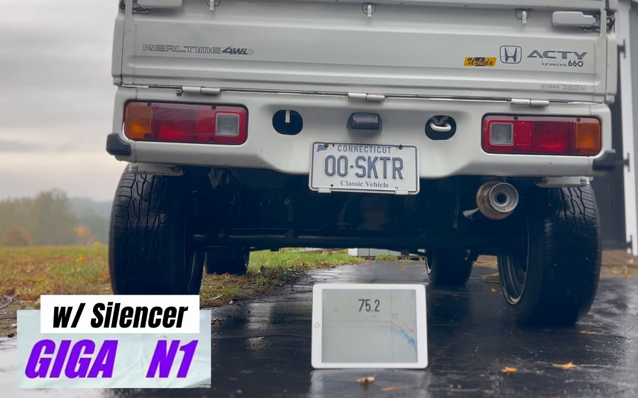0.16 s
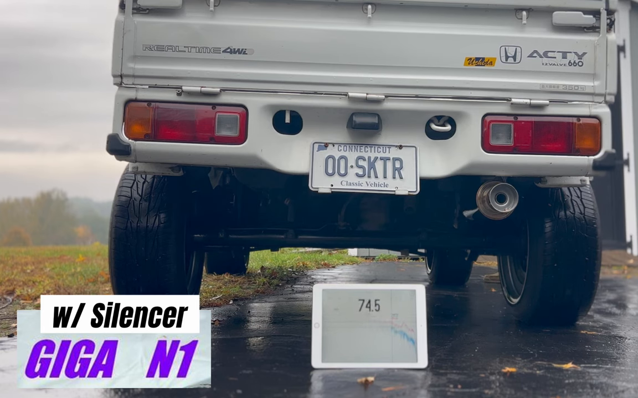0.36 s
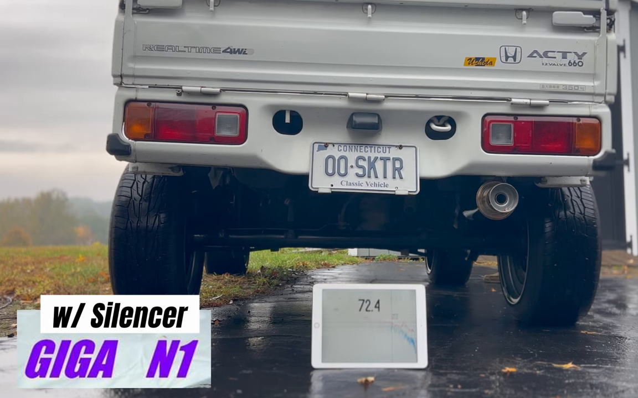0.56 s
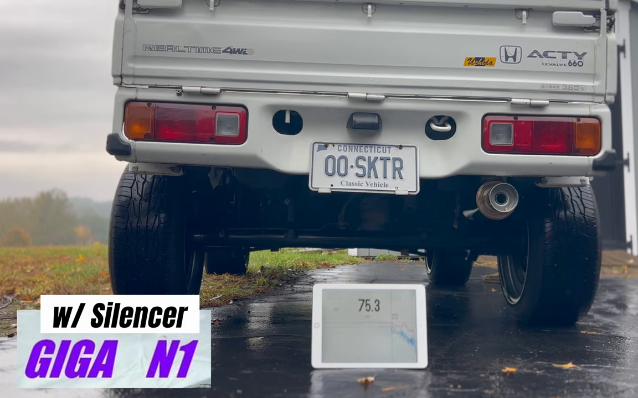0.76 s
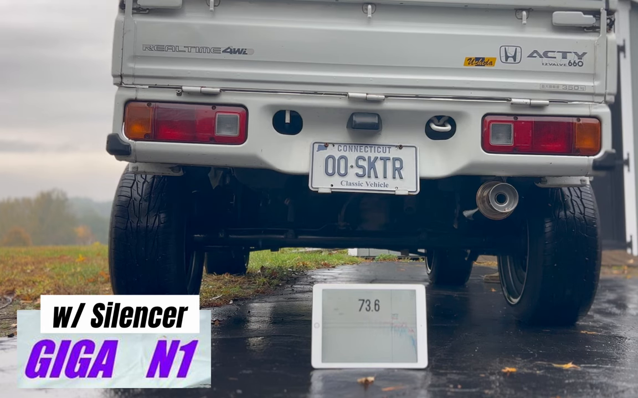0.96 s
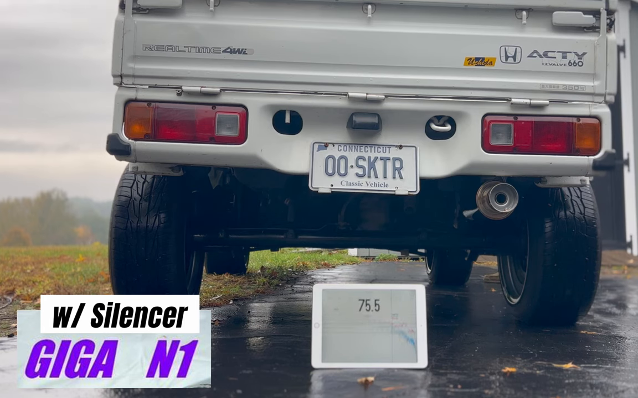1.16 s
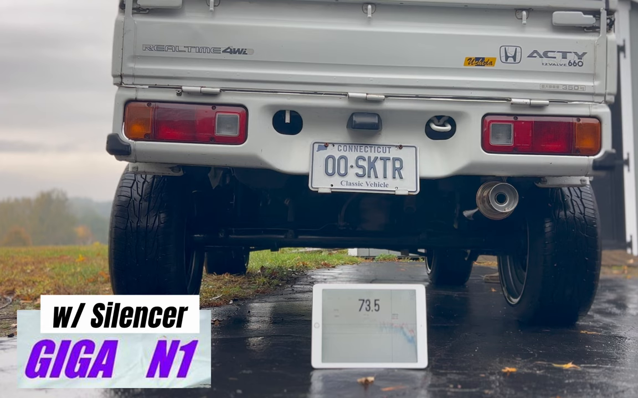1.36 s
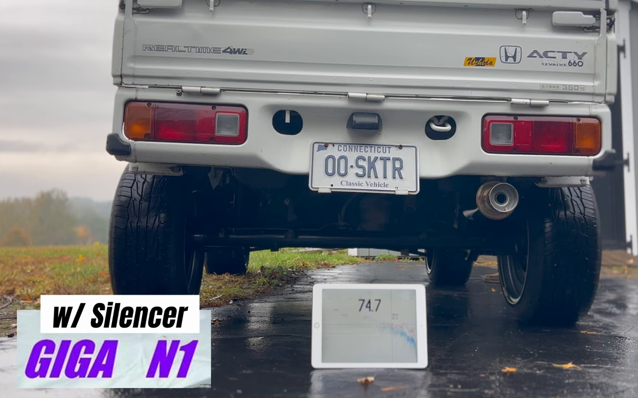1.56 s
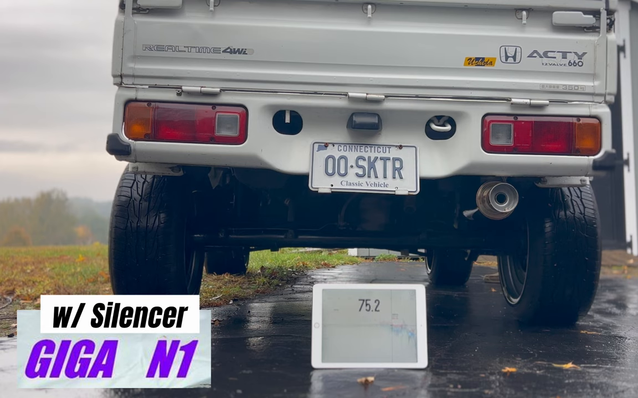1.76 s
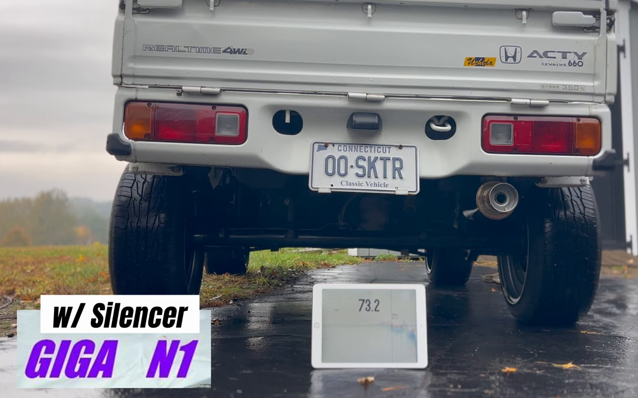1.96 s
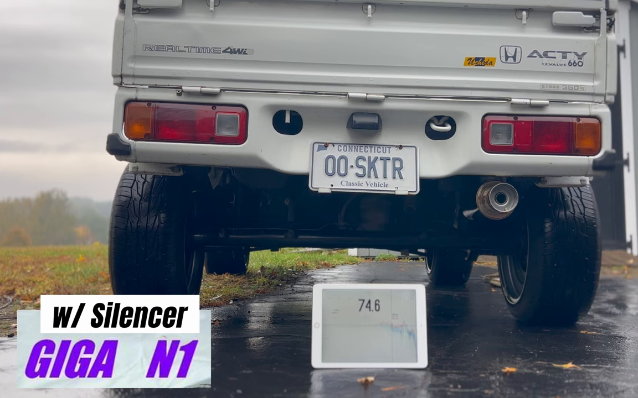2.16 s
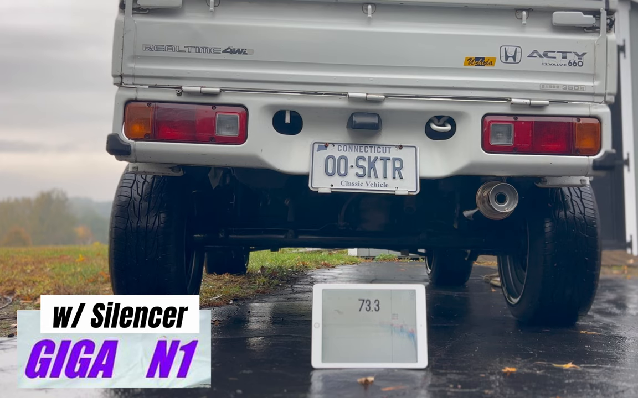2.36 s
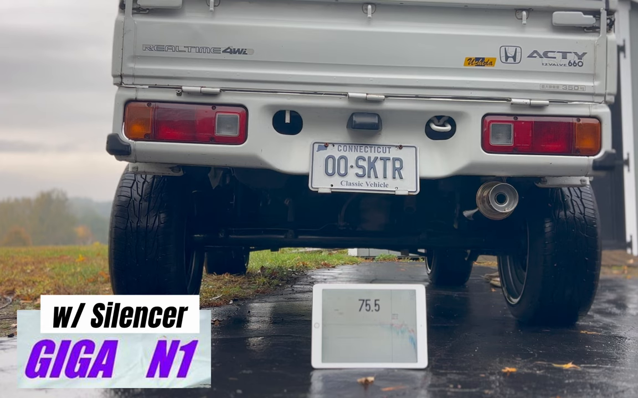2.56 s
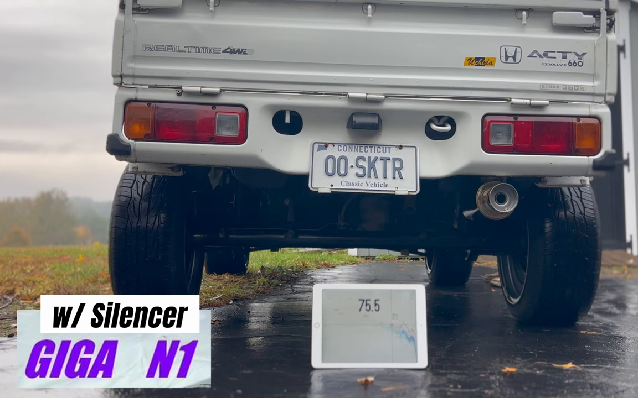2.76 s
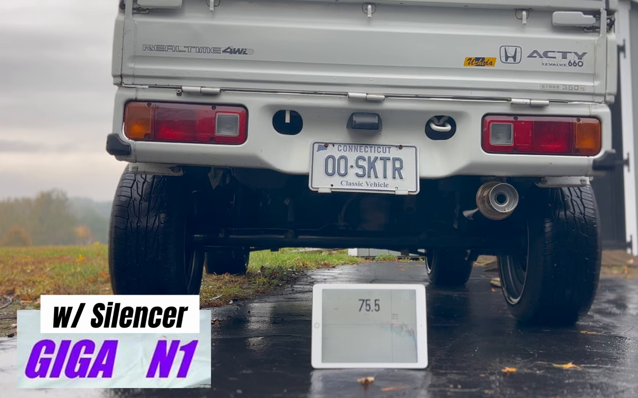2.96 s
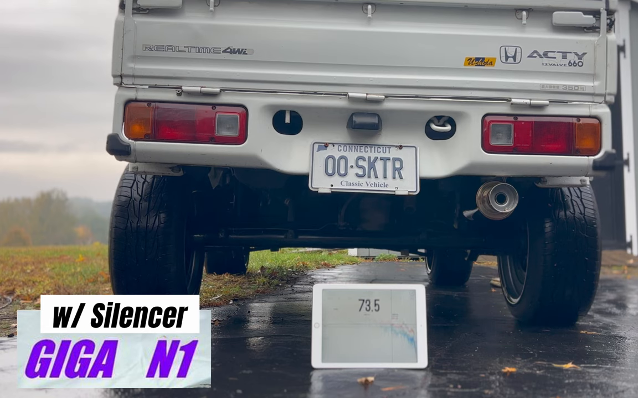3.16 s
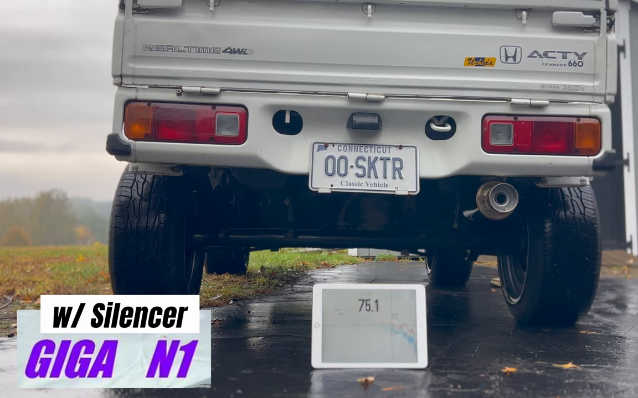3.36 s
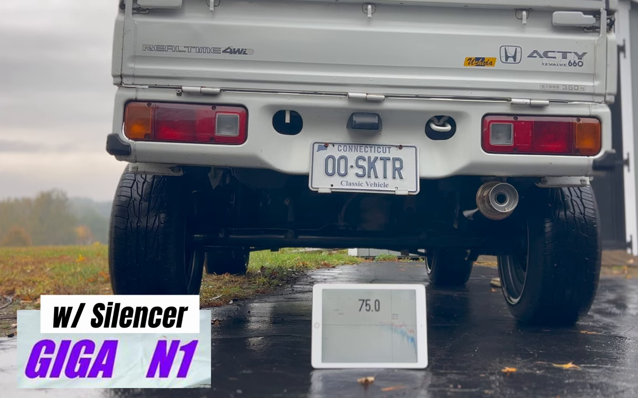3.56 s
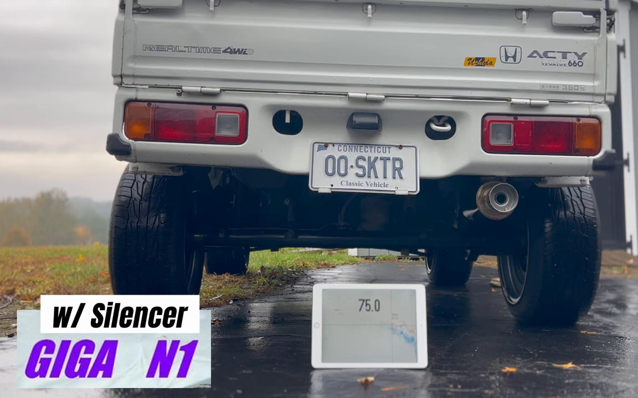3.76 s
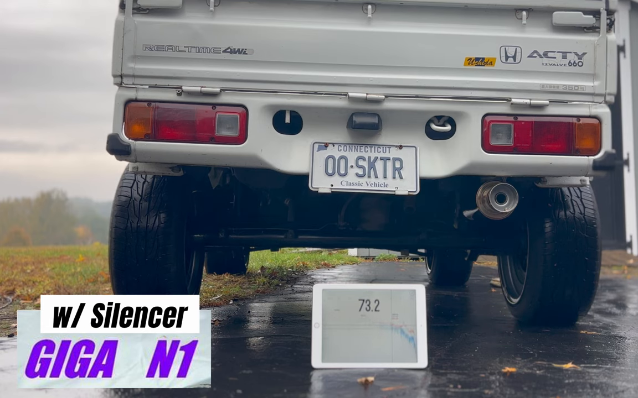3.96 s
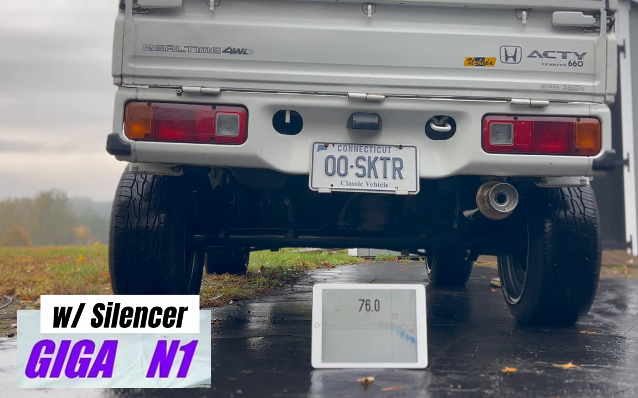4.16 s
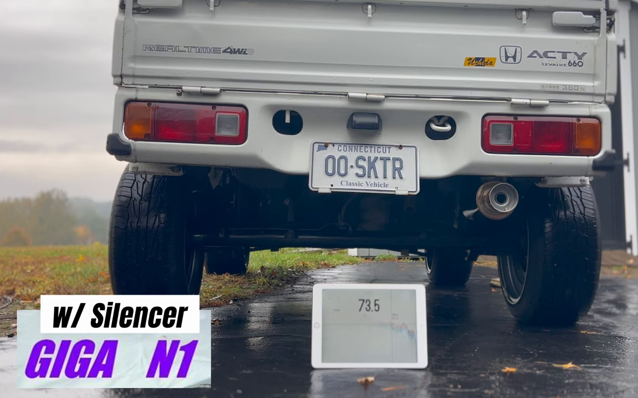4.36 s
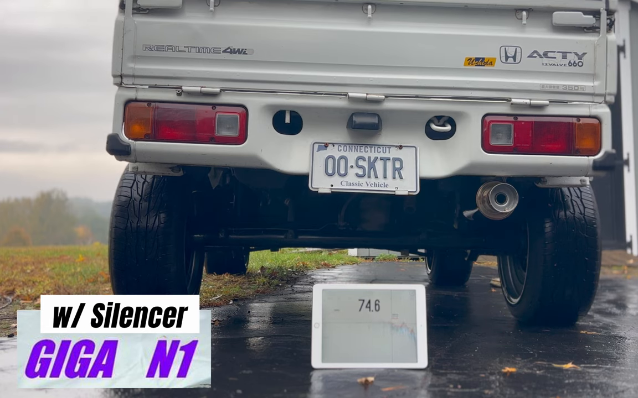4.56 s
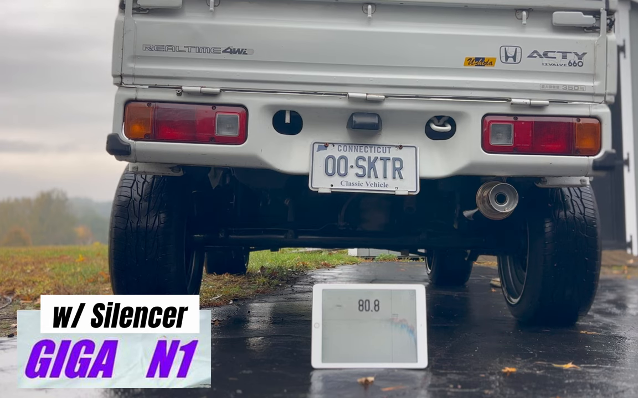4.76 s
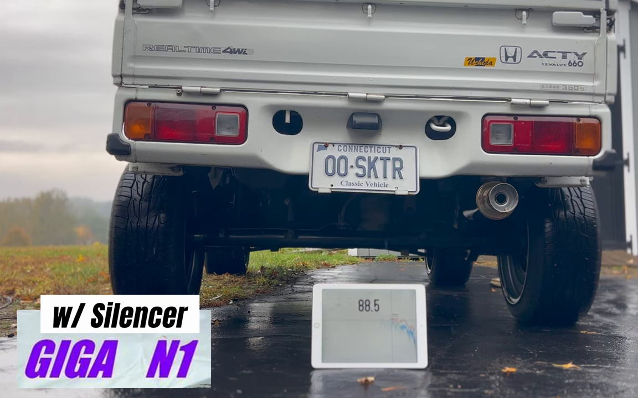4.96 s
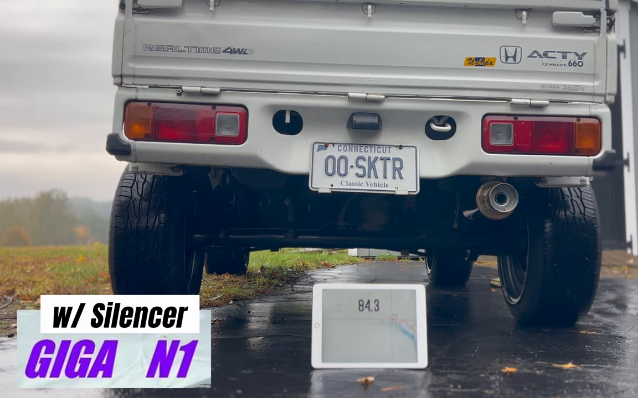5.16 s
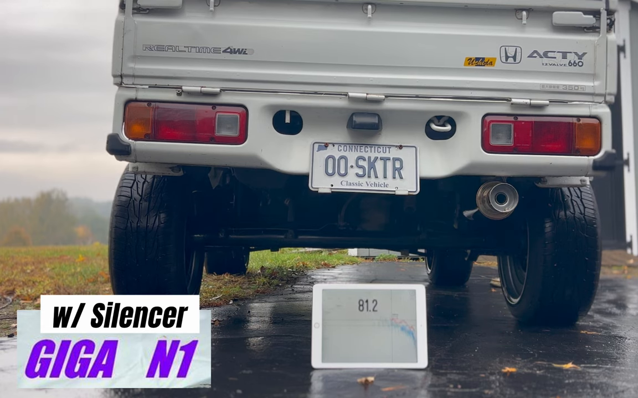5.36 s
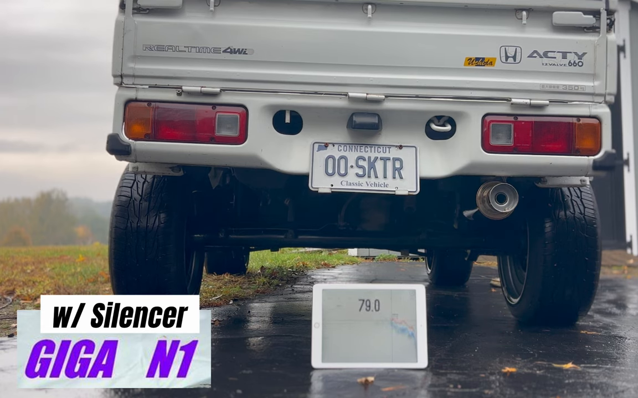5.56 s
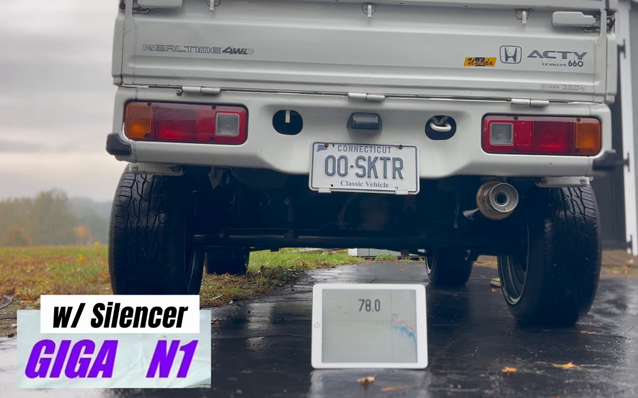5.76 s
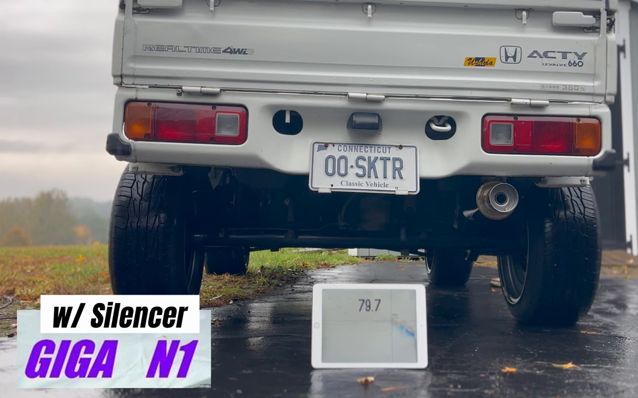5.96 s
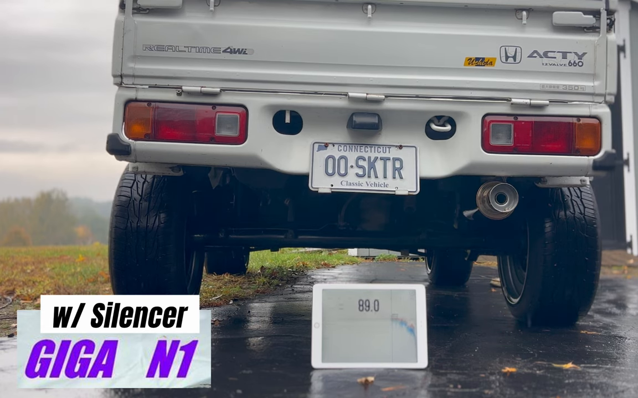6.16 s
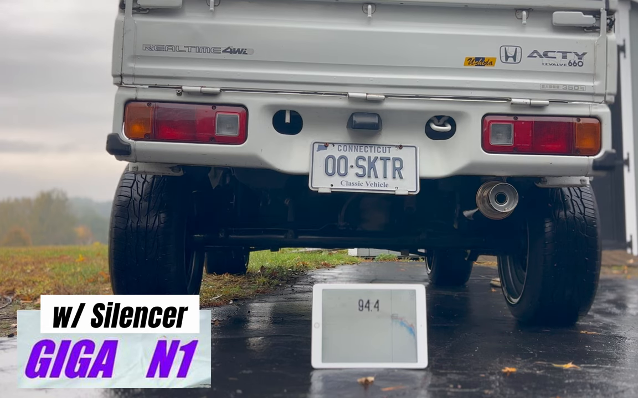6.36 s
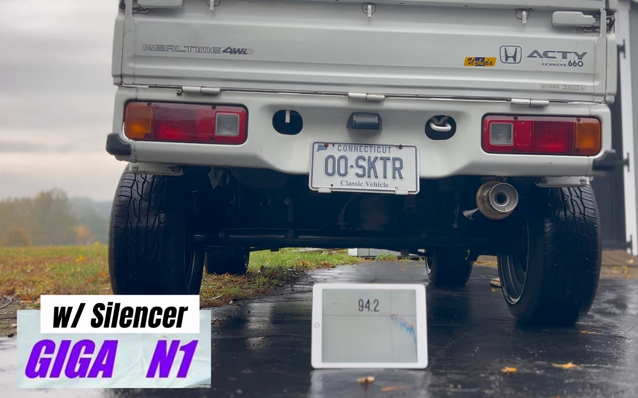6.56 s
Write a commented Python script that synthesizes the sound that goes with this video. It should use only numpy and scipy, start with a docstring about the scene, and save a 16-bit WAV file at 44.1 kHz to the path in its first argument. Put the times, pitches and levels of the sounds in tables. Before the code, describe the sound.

A steady lumpy idle of a small truck engine, deep muffled putts with fine dry ticks, heard dry and near in open air by a stereo microphone behind the exhaust. After four seconds the throttle is stabbed, giving a short throaty burst that hangs and falls. Before it reaches idle, a stronger press climbs into a fast raspy growl with accessory whine and gas rush, easing slightly before another stab.

```python
"""Three-cylinder truck, blipped and revved

A small truck idles on wet tarmac, is blipped once, then revved higher, heard from just behind its tailpipe.
Each firing thumps through the silencer, rasps in the pipework and puffs out gas; the valves tick in between.
A driven accessory whines with engine speed, and a faint thin squeal passes early on.
At speed the exhaust growls, the open throttle cracks, and gas rushes brightly near top revs."""
import sys
import numpy as np
from scipy import signal
from scipy.fft import rfft, irfft, next_fast_len
from scipy.io import wavfile

SR = 44100
rng = np.random.default_rng(int(sys.argv[2]) if len(sys.argv) > 2 else 0)


def master(y):
    """Save y as 16-bit WAV."""
    cut = np.clip(np.atleast_2d(y).T, -1, 1)
    pcm = np.round(cut * 32767)  # scale
    wavfile.write(sys.argv[1], SR, pcm.astype(np.int16))


N = 295470
TIME = np.arange(N) / SR  # s
IDLE_HZ = 20.4  # reference firing rate at idle


def undb(db):
    """Decibels to gain."""
    return 10 ** (np.asarray(db) / 20)


def unit(x):
    """Scale to rms 1."""
    return x / np.sqrt(np.mean(x ** 2))


def colour(x, points):
    """Minimum-phase filter through (Hz, dB) points, joined by straight lines over log frequency."""
    size = 2 ** 14
    hz, db = np.transpose(points)
    bins_hz = np.fft.rfftfreq(size, 1 / SR) + 1  # the 1 keeps the logarithm finite
    curve_db = np.interp(np.log(bins_hz), np.log(hz), db)
    # folding the cepstrum onto positive time makes the filter causal
    cepstrum = irfft(np.log(undb(curve_db)))[:size // 2]
    cepstrum[1:] *= 2
    response = irfft(np.exp(rfft(cepstrum, size)))[:size // 2]
    return signal.fftconvolve(np.atleast_2d(x), response[None], axes=-1)[:, :N]


def ring(x, modes):
    """The sound itself plus its ringing in (Hz, width Hz, dB) resonances."""
    total = x
    for hz, width_hz, db in modes:
        b, a = signal.iirpeak(hz, hz / width_hz, SR)
        total = total + undb(db) * signal.lfilter(b, a, x)
    return total


def delay(x, ms):
    """Delay by any fraction of a sample, by turning the phase of the spectrum."""
    size = next_fast_len(N + SR // 10)
    cycles = np.fft.rfftfreq(size, 1 / SR) * ms / 1000
    return irfft(rfft(x, size) * np.exp(-2j * np.pi * cycles), size)[..., :N]


def stereo(x, lag_ms, left_db):
    """Place a sound by making the left channel later and louder (softer if left_db is negative)."""
    left = delay(x[0], lag_ms) * undb(left_db / 2)
    right = x[-1] * undb(-left_db / 2)
    return np.array([left, right])


def air(scatter):
    """Stereo noise: a common part and a coloured part scattered by ground and underbody."""
    scatter_colour = [(200, -12.0), (600, 2.5), (5000, 6), (8000, 1.5), (12000, -8)]
    scattered = colour(rng.standard_normal((2, N)), scatter_colour)
    common = rng.standard_normal(N)
    return unit(common + scatter * scattered)


def clicks(times, sizes):
    """One impulse per event, shared between neighbouring samples for exact timing."""
    inside = (times > 0) & (times < TIME[-2])
    index, part = np.divmod(times[inside] * SR, 1)
    index = index.astype(int)
    earlier = np.bincount(index, sizes[inside] * (1 - part), N)
    later = np.bincount(index + 1, sizes[inside] * part, N)
    return earlier + later


def puffs(impulses, rise_s, decay_s):
    """Each impulse becomes an envelope that rises and dies away exponentially."""
    fall, rise = np.exp(-1 / (SR * decay_s)), np.exp(-1 / (SR * rise_s))
    return signal.lfilter([1 - rise], np.poly([fall, rise]), impulses)


def steady(x, phase, count=3):
    """Hold the rms near 1 over each run of `count` firings."""
    energy = np.cumsum(np.mean(np.atleast_2d(x) ** 2, axis=0))
    samples = np.arange(N)
    first = np.interp(phase - count / 2, phase, samples).astype(int)
    last = np.interp(phase + count / 2, phase, samples).astype(int)
    power = np.abs(energy[last] - energy[first]) / (last - first)
    return x / np.sqrt(power + 1e-18)


def held(start, end, attack_s, release_s):
    """Envelope that rises from the start, holds, and falls from the end."""
    rising = (TIME - start) / attack_s
    falling = 1 - (TIME - end) / release_s
    return np.clip(np.minimum(rising, falling), 0, 1)


# The cylinders in firing order. Each row: lateness in firing intervals, strength in dB,
# share reflected in the manifold at idle (signed, 0-1), relative valve tick in dB.
FIRING_CYLINDERS = [(-0.0037, 1, -0.085, 0.5), (0.0177, 0.9, 0.84, 2), (-0.016, -0.03, -0.14, 0.5)]


def firings(phase, timing_scatter, strength_scatter_db):
    """Time, strength, manifold reflection and valve tick of every firing; no two are quite alike."""
    number = np.arange(int(phase[-1]) + 1)
    rows = np.array(FIRING_CYLINDERS)[number % len(FIRING_CYLINDERS)]
    late, db, reflection, tick_db = rows.T
    chance = rng.standard_normal((len(number), 2))
    times = np.interp(number + late + timing_scatter * chance[:, 0], phase, TIME)
    sizes = undb(db + strength_scatter_db * chance[:, 1])
    return times, sizes, reflection, tick_db


# The accelerator. Each row: foot down in seconds, foot up in seconds, time to open in seconds,
# throttle opening (0-1).
PEDAL_PRESSES = [(4.397, 4.64, .11, 0.97), (5.663, 6.205, 0.13, 0.76), (6.594, 6.8, 0.11, 0.66)]
# Light charge that lingers after the foot lifts: the revs hang after the first press and ease after the second.
# # Each row: start in seconds, end in seconds, charge (0-1), extra boom in dB.
LIGHT_CHARGES = [(4.783, 5.026, .45, 6), (6.255, 6.662, 0.64, 0.7)]
SHUT_S = 0.078  # the throttle falls shut
FILL_S, EMPTY_FIRINGS = 0.16, 11.4  # the manifold fills quickly and empties firing by firing
HANG_FADE_S = 0.05


def effort(hz):
    """Throttle opening and cylinder charge (both 0-1): the manifold empties slowly, so charge outlasts a press."""
    throttle, charge = 0, 0
    for down, up, open_s, opening in PEDAL_PRESSES:
        throttle = throttle + opening * held(down, up, open_s, SHUT_S)
        empty_s = EMPTY_FIRINGS / np.interp(up, TIME, hz)
        fill = held(down, up, FILL_S, empty_s)
        charge = np.maximum(charge, np.sin(np.pi / 2 * fill))
    for start, end, hang_charge, _ in LIGHT_CHARGES:
        hang = held(start - HANG_FADE_S, end, HANG_FADE_S, HANG_FADE_S)
        charge = np.maximum(charge, hang_charge * hang)
    return throttle, charge


BOOM_DB, BOOM_KNEE_HZ, BOOM_STEEPNESS = -7.5 - 1.97, 72.8, 8.46  # full above the knee, steep fall below
DIP_DB, DIP_FIRINGS = 7, 2.8  # depth and half-width of the brief dips in the boom


def boom_level(hz):
    """The fundamental grows with speed, swells while a light charge lingers and dips at either end of it (dB)."""
    db = BOOM_DB - 10 * np.log10(1 + (BOOM_KNEE_HZ / hz) ** BOOM_STEEPNESS)
    for start, end, _, extra_db in LIGHT_CHARGES:
        dips = sum(np.exp(-((TIME - edge) * hz / DIP_FIRINGS) ** 2) for edge in (start, end))
        db = db + extra_db * held(start, end, HANG_FADE_S, HANG_FADE_S) - DIP_DB * dips
    return db


# at idle, with speed, on a full charge
BARK_DB, BARK_DB_PER_OCTAVE, BARK_CHARGE_DB = -23 - 0.52, -2.5, 15.5
# at idle, with speed, on a full charge
RASP_DB, RASP_DB_PER_HZ, RASP_CHARGE_DB = -42.5 + 0.66, 0.2242, 1.5
# wide open at idle speed, and how much less the throttle adds as speed rises
RASP_THROTTLE_DB, RASP_EASE_DB_PER_OCTAVE = 10, 1.5
# at idle, with speed, wide open
HISS_DB, HISS_DB_PER_OCTAVE, HISS_THROTTLE_DB = -55.5 + 2.5, 8.5, 6


def levels(hz, throttle, charge):
    """Bark, rasp and hiss (dB) rise with effort; speed softens the single pulse but drives more gas."""
    octaves = np.log2(hz / IDLE_HZ)
    bark_db = BARK_DB + BARK_DB_PER_OCTAVE * octaves + BARK_CHARGE_DB * charge
    open_db = RASP_THROTTLE_DB - RASP_EASE_DB_PER_OCTAVE * octaves
    rasp_db = RASP_DB + RASP_DB_PER_HZ * (hz - IDLE_HZ) + open_db * throttle + RASP_CHARGE_DB * charge
    hiss_db = HISS_DB + HISS_DB_PER_OCTAVE * octaves + HISS_THROTTLE_DB * throttle ** 2
    return bark_db, rasp_db, hiss_db


# What the silencer lets through. Each row: frequency in Hz, gain in dB.
SILENCER_COLOUR = [(22, -59.5), (40, -8.5), (62, 3.5), (88, 3.5), (125, -1.5), (165, -3.5), (205, -20.5),
                   (280, -34), (400, -40), (600, -40), (1200, -67.5)]
# Standing wave of the tailpipe. Each row: frequency in Hz, width in Hz, ringing in dB over the direct sound.
TAILPIPE_MODES = [(169.4, 12.7, 0)]


def exhaust(phase, hz, times, sizes, reflection, boom_db, bark_db):
    """Pressure pulses run down the pipe and through the silencer: a smooth boom and the bark of its overtones."""
    slowness = IDLE_HZ / np.interp(times, TIME, hz)
    # the manifold reflection makes the idle lumpy and evens out with speed
    lumpy = reflection * slowness ** 3.2
    pulses = clicks(times, sizes) + delay(clicks(times, sizes * lumpy), ms=8.04)
    # a weak return from the far end of the system fills the gaps between slow firings
    pulses = pulses + delay(clicks(times, 0.2 * sizes * slowness), ms=22.56)
    fundamental = 2 * hz / SR * np.cos(2 * np.pi * phase)
    overtones = pulses - fundamental

    def through_pipe(part):
        """Travel, tailpipe resonance and silencing, held to an even level."""
        return steady(colour(ring(delay(part, ms=5.19), TAILPIPE_MODES), SILENCER_COLOUR), phase)

    boom = through_pipe(fundamental) * undb(boom_db)
    bark = through_pipe(overtones) * undb(bark_db)
    return stereo(boom + bark, lag_ms=0.13, left_db=1.38)


# Broad colour of the rasp. Each row: frequency in Hz, gain in dB.
RASP_COLOUR = [(120, -12), (250, 15), (450, -5.5), (750, 0), (1100, -9), (1400, -7.5), (1900, -34.5),
               (3000, -31.5), (6000, -71)]
# Ringing of pipework and underbody. Each row: frequency in Hz, width in Hz, ringing in dB over the direct sound.
PIPEWORK_MODES = [(465, 37.4, 18), (584, 60, 1), (683.5, 5.3, 12), (895.7, 16.6, 10), (991, 73, 5),
                  (1083, 25, 8), (1360, 43, -22.5), (1492, 22, 7.5), (1626, 72, 11.5)]
# Crack of the gas front on a wide-open throttle. Each row: frequency in Hz, gain in dB.
CRACK_COLOUR = [(500, -44), (1100, 28), (1700, 8), (2500, 23), (3600, -29), (7000, -57)]


def rasp(phase, hz, times, sizes, throttle, rasp_db):
    """Turbulence and shock fronts ring the pipework; with the throttle open they crack at each firing."""
    fronts = clicks(times, sizes)
    bursts = puffs(fronts, rise_s=0.0007, decay_s=0.0026)
    turbulence = air(scatter=0.5) * (1 + (0.3 + 5.5 * throttle ** 2) * bursts)
    shock = (2.5 + 5.5 * throttle) * hz / IDLE_HZ * fronts
    body = steady(ring(colour(turbulence + shock, RASP_COLOUR), PIPEWORK_MODES), phase)
    crack = steady(colour(air(scatter=1.0) * bursts, CRACK_COLOUR), phase)
    crack = crack * throttle ** 2 * undb(-13.0 - 0.66)  # relative to the body
    return stereo((body + crack) * undb(rasp_db), lag_ms=0.034, left_db=2.5)


# Gas leaving the tailpipe. Each row: frequency in Hz, gain in dB.
GAS_COLOUR = [(700, -0.5), (1600, 3), (2500, 0.5), (3500, -1.5), (5400, -8), (7500, -2.5), (10000, -2),
              (13000, -56), (16000, -21)]


def gas(phase, pulses, throttle, hiss_db):
    """Gas hisses out of the tailpipe as turbulent noise, puffing harder under load."""
    bursts = puffs(pulses, rise_s=0.004, decay_s=0.0078)
    jet = air(scatter=0.76) * (1 + (0.81 + 0.71 * throttle) * bursts)
    hiss = steady(colour(jet, GAS_COLOUR), phase)
    return stereo(hiss * undb(hiss_db), lag_ms=0.041, left_db=1.1)


# Tick of a valve. Each row: frequency in Hz, gain in dB.
TICK_COLOUR = [(1500, -34), (3500, -7), (5400, -14), (7400, 1.5), (10000, 3.5), (12800, -4.5), (16000, -6)]
# Softer tick of a valve settling on its seat. Each row: frequency in Hz, gain in dB.
SEAT_COLOUR = [(3000, -29), (5600, -17.5), (7800, -1.5), (9500, -4), (13000, -12), (16000, -20)]


def valves(hz, times, tick_db):
    """Each exhaust valve ticks sharply as it opens and softly half an interval later, a touch louder with speed."""
    rate = np.interp(times, TIME, hz)
    chance = rng.standard_normal((len(times), 3))
    db = tick_db + 0.13 * np.log2(rate / IDLE_HZ)
    # offsets are in firing intervals
    open_times = times - 0.068 / rate
    close_times = times + (0.425 + 0.015 * chance[:, 2]) / rate
    opening = clicks(open_times, undb(db + 2.1 * chance[:, 0]))
    closing = clicks(close_times, undb(db + 0.5 + 1.2 * chance[:, 1]))
    tick = colour(air(scatter=0.13) * puffs(opening, rise_s=0.00097, decay_s=0.0035), TICK_COLOUR)
    seat = colour(air(scatter=0.62) * puffs(closing, rise_s=0.0038, decay_s=0.0047), SEAT_COLOUR)
    return stereo((tick + seat) * undb(-33), lag_ms=0.042, left_db=-1.1)


# The panel that the whine sets ringing. Each row: frequency in Hz, width in Hz, ringing in dB over the direct whine.
PANEL_MODES = [(688, 3.5, 26)]
WHINE_ORDER = 40 / 3  # cycles per firing


def whine(phase, hz):
    """A belt-driven accessory sings at a multiple of the firing rate, louder with speed; a panel rings as it passes."""
    flutter = unit(colour(rng.standard_normal(N), [(25, 1), (120, -36), (500, -87)]))
    tone = np.sin(2 * np.pi * WHINE_ORDER * phase + 0.65 * flutter)
    db = -35.5 + 13.0 * np.log2(hz / hz.max())
    return stereo(ring(tone * undb(db), PANEL_MODES), lag_ms=0.07, left_db=1.5)


def squeal(peak_s, width_s, hz, db):
    """A faint thin squeal: a pure tone, equal in both channels, swells and fades."""
    swell = np.exp(-((TIME - peak_s) / width_s) ** 2)
    return undb(db) * swell * np.sin(2 * np.pi * hz * TIME)


# Upper overtones that break through the silencer at speed. Each row: frequency in Hz, gain in dB.
GROWL_COLOUR = [(150, -34.5), (190, 15.5), (255, 0.5), (320, 2.5), (385, -3), (470, -8.5), (700, -29),
                (1120, -8), (1800, -51.5)]


def growl(phase, hz, times, sizes, reflection, bark_db):
    """At speed the pulses steepen; unequal cylinders add tones between the firing harmonics."""
    fronts = delay(clicks(times, sizes * (1 + 0.43 * reflection)), ms=4.91)
    db = bark_db + 0.52 - 8.5 + 8.0 * np.log2(hz / hz.max())
    overtones = steady(colour(fronts, GROWL_COLOUR), phase)
    return stereo(overtones * undb(db), lag_ms=0.013, left_db=2.5)


# Rush of gas through the silencer at the highest revs. Each row: frequency in Hz, gain in dB.
RUSH_COLOUR = [(1000, -17), (2400, 0.5), (3800, -1.5), (5500, -21), (9000, -15), (11000, -42)]


def rush(hz, throttle, top_db, db_per_octave, throttle_db):
    """A bright rush of turbulent gas near top speed, strongest just after the throttle shuts."""
    db = top_db + db_per_octave * np.log2(hz / hz.max()) + throttle_db * throttle
    noise = unit(colour(air(scatter=0.6), RUSH_COLOUR))
    return stereo(noise * undb(db), lag_ms=0.029, left_db=4.0)


# Engine speed. Each row: time in seconds, firing rate in Hz.
ENGINE_SPEED = [(0.0, 20.22), (1.81, 20.22), (3.3, 20.57), (4.43, 20.58), (4.7, 53.06), (4.8, 47.47),
                (5.01, 47.62), (5.08, 43.81), (5.7, 33.15), (5.83, 45.2), (6.18, 93.59), (6.27, 96.03),
                (6.59, 83.09), (6.7, 85.24)]
START_PHASE = -0.24  # firings
CRACK_LEAD_S = 0.002894  # the shock front runs ahead of the thump
GROWL_THROTTLE_DB = 5  # an open throttle steepens the pulses


def scene():
    """Engine speed and throttle drive the truck's sounds; the squeal keeps its own time."""
    hz = np.interp(TIME, *np.transpose(ENGINE_SPEED))
    throttle, charge = effort(hz)
    bark_db, rasp_db, hiss_db = levels(hz, throttle, charge)
    phase = START_PHASE + np.cumsum(hz) / SR  # counts firings
    times, sizes, reflection, tick_db = firings(phase, timing_scatter=0.0066, strength_scatter_db=1.56)
    return (exhaust(phase, hz, times, sizes, reflection, boom_level(hz), bark_db)
            + rasp(phase, hz, times - CRACK_LEAD_S, sizes, throttle, rasp_db)
            + gas(phase, clicks(times, sizes), throttle, hiss_db)
            + valves(hz, times, tick_db)
            + whine(phase, hz)
            + squeal(peak_s=0.56, width_s=0.33, hz=1930, db=-60)
            + growl(phase, hz, times, sizes, reflection, bark_db + GROWL_THROTTLE_DB * throttle)
            + rush(hz, throttle, top_db=-33.5, db_per_octave=45, throttle_db=-18))


def record(dry):
    """Round the highest peaks smoothly and cut the top with a steep low-pass."""
    rounded = dry / (1 + (dry / 0.97) ** 8) ** (1 / 8)
    low_pass = signal.ellip(8, 0.2, 80, 15900, fs=SR, output="sos")  # ripple dB, stopband dB, cutoff Hz
    return signal.sosfilt(low_pass, rounded)


dry = scene()
out = record(dry)
master(out)
```